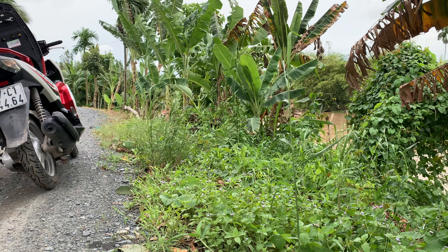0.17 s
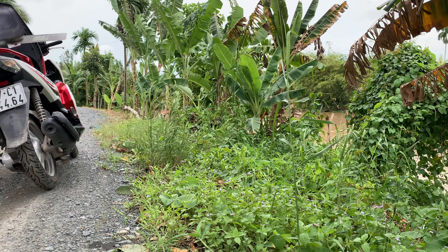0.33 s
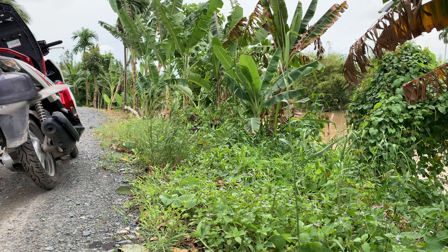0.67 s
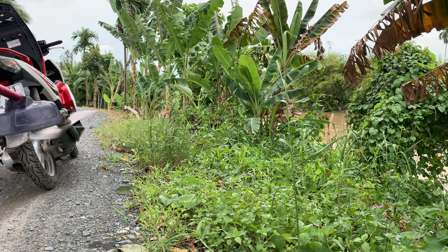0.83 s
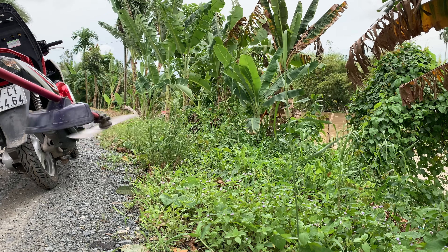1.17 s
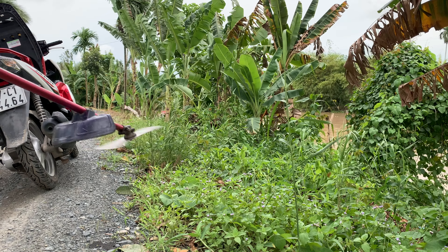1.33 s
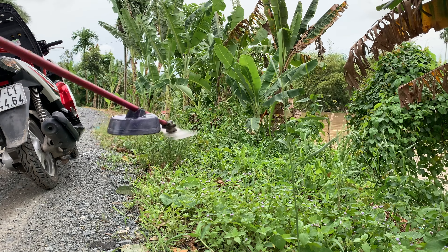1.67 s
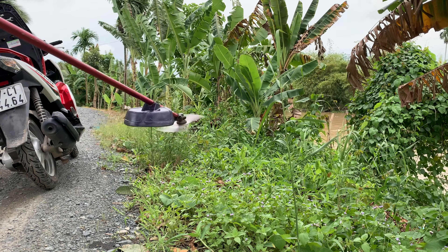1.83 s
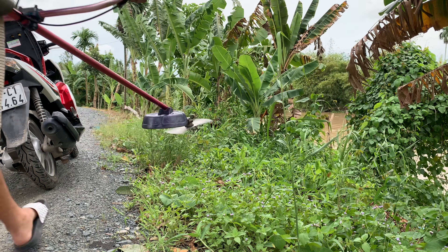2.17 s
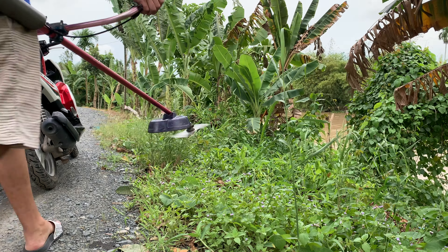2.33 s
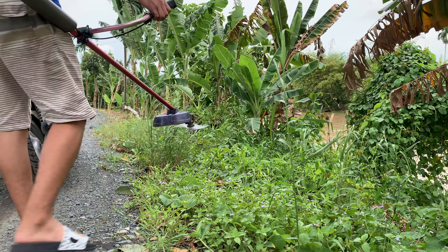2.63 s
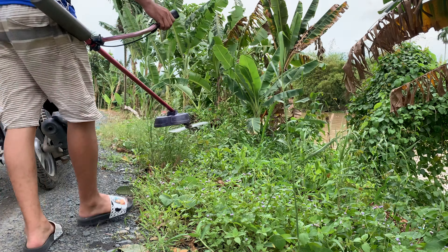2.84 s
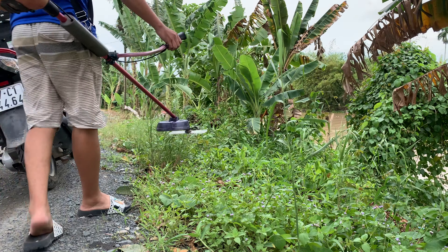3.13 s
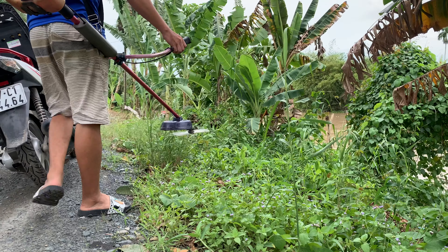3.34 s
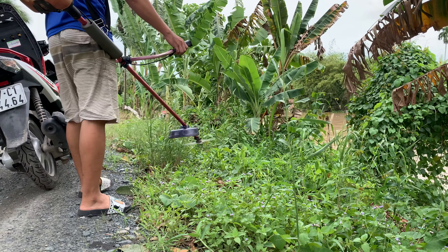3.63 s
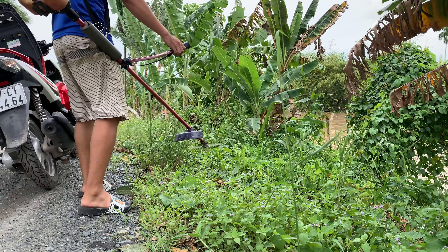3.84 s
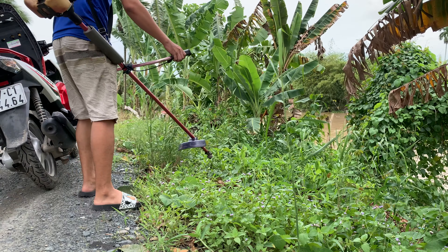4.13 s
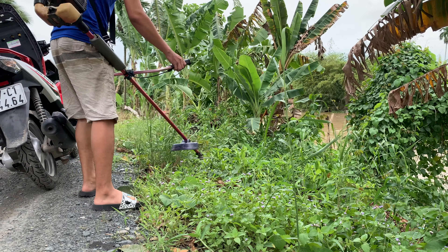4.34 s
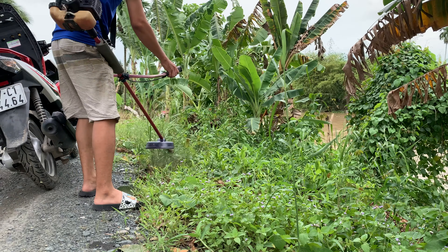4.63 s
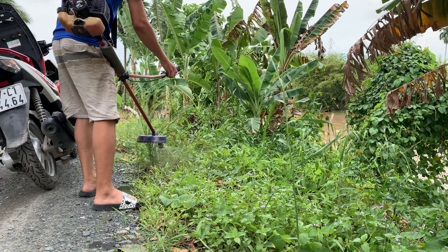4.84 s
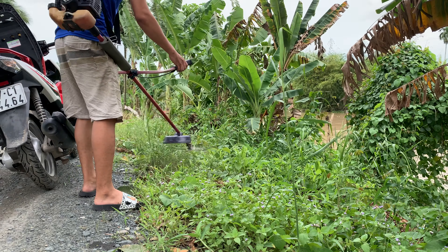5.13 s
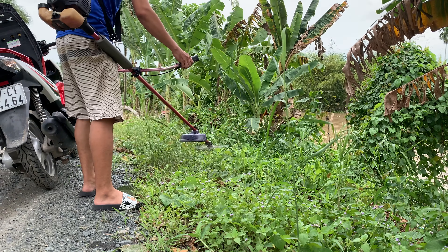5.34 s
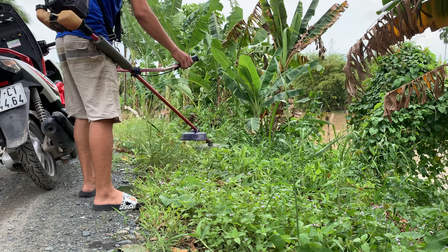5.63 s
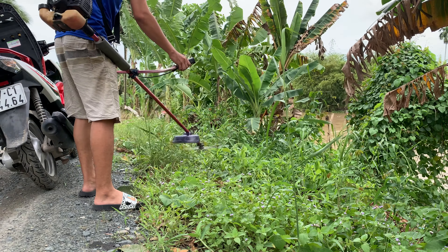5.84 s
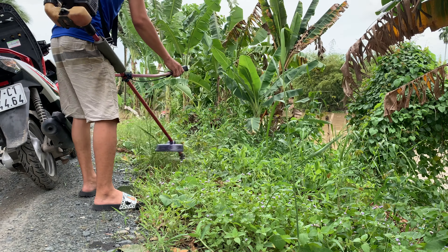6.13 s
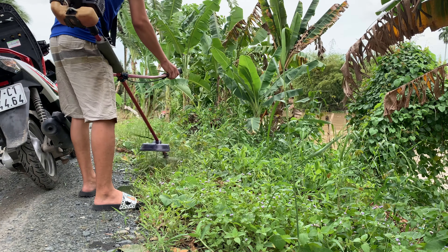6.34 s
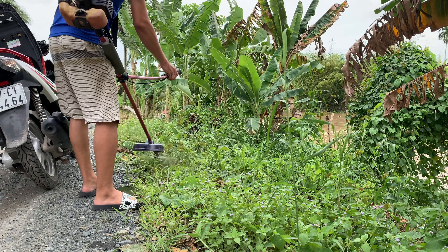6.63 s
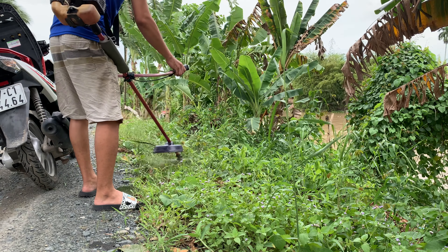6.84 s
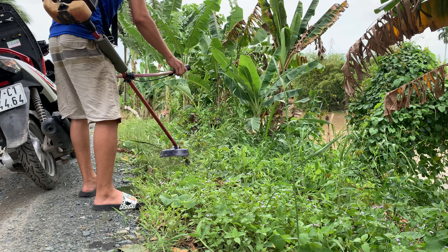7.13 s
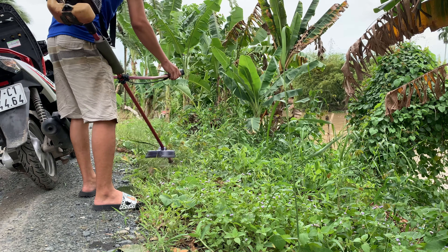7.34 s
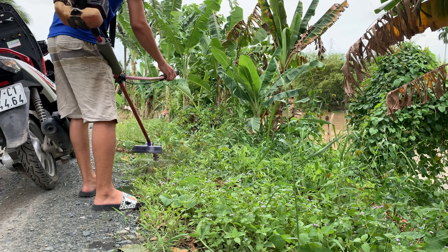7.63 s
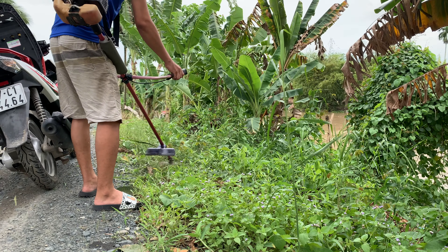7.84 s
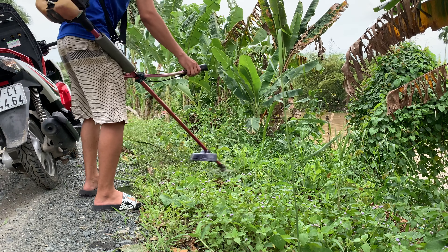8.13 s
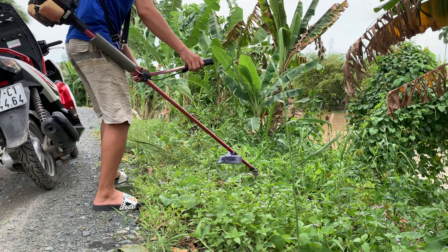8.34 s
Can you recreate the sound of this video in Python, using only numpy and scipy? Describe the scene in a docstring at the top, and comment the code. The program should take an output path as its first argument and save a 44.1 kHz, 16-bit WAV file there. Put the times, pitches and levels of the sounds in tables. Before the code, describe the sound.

A small two-stroke brushcutter buzzes past close by, sputtering unevenly, then moves off, revs up and tears through grass beside a softly thumping idling scooter.

```python
"""Roadside verge: a man carries a running two-stroke brushcutter past the microphone, then cuts grass.
The engine falls into spells of uneven firing, every second or third turn hard; muffler resonances
shape its pulses into a boom that fades with distance, a honk and a hum, with rasp and fan whine on top.
Filtered noise makes the blade's hiss, passing bands of hiss and rattle, and bursts of snaps as it tears
leaves and cracks stalks; grit ticks underfoot, and a parked scooter idles in slow thumps."""
import sys
import numpy as np
from scipy import signal
from scipy.fft import rfft, irfft
from scipy.io import wavfile
from scipy.ndimage import uniform_filter1d, map_coordinates

SR = 44100
rng = np.random.default_rng(int(sys.argv[2]) if len(sys.argv) > 2 else 0)


def generate_wav(signal):
    """Clip the signal to [-1, 1] and save it as 16-bit WAV at the path in sys.argv[1]."""
    frames = np.transpose(np.atleast_2d(signal))
    scaled = np.clip(frames, -1, 1) * 32767
    pcm = np.round(scaled).astype(np.int16)
    wavfile.write(sys.argv[1], SR, pcm)


N = 374409
T = np.arange(N) / SR

# crank speed: time_s, turns_hz
CRANK_SPEED = [(0.0, 68.81), (0.08, 73.0), (0.2, 74.96), (0.4, 74.11), (0.88, 76.8), (1.12, 78.6),
               (1.36, 77.8), (1.44, 75.12), (1.6, 71.8), (2.24, 68.51), (2.48, 68.19), (2.56, 68.68),
               (2.72, 71.35), (2.88, 77.13), (2.96, 78.93), (3.24, 78.54), (3.48, 79.6), (3.88, 79.95),
               (4.32, 78.53), (4.52, 79.4), (4.68, 79.22), (4.88, 81.86), (5.32, 90.7), (5.88, 92.67),
               (6.16, 90.76), (6.44, 85.39), (6.68, 82.5), (6.92, 78.26), (7.24, 77.47), (7.4, 74.78),
               (7.6, 75.15), (8.48, 75.77)]
# exhaust before surges: time_s, honk_db, hum_db
EXHAUST_LEVELS = [(0, -23.5, -20.5), (.7, -21.5, -19.5), (1.6, -23.5, -26.5), (2.2, -23.5, -29),
                  (2.65, -22.5, -26), (2.95, -18, -22), (4.1, -23, -24), (5.2, -26.5, -30),
                  (8.49, -28, -33)]
# extra hard firings: time_s
BANG_TIMES_S = [.335, .376, .417, .484, .563, .671, .762, .828, .867, .906, .945, .984, 1.112, 1.264, 4.002,
                4.028, 4.203, 4.305, 4.331, 4.356, 4.457, 4.482, 5.9, 5.932, 5.965, 5.998, 6.107, 6.24,
                6.494, 6.934, 6.985, 7.126, 7.216, 7.893, 7.946, 7.986, 8.066, 8.106, 8.147, 8.213]
# hard firing against an average turn; the starved turns beside it lose as much: time_s, gain_db
BANG_GAINS = [(1.3, 3.8), (4.3, 4.2), (5.9, 5.8)]
# spells of uneven firing: start_s, length_s, stumble_0_to_1, timing_jitter_ms, turns_per_hard_firing
UNEVEN_SPELLS = [(0.295, 0.95, 0.99, 0.093, 3), (1.905, 1.05, 0.86, 0.11, 3), (3.244, 0.22, 0.88, 0.26, 2),
                 (4, 0.32, 0.7, 0.08, 2), (5.25, 1.2, 0.8, 0.34, 3), (6.716, 0.77, 0.91, 0.21, 2),
                 (7.872, 0.96, 0.87, 0.17, 3)]
# brief exhaust swells and lulls: middle_s, length_s, change_db
EXHAUST_SURGES = [(0.272, .07, -2), (1.5, 0.42, -3.5), (4.503, 0.082, 4), (4.675, 0.27, -6),
                  (6.596, 0.14, 5.5), (7.58, 0.18, -4.5)]
# tailpipe resonances: pitch_hz, q, gain_ratio
TAILPIPE_RINGS = [(544, 104, 1.0), (623, 9.7, 0.81)]
# cooling fan whine: time_s, level_db
FAN_WHINE = [(0, -21), (.5, -47), (1.6, -54), (2.2, -28.5), (2.6, -40), (3.0, -27.5), (3.6, -32.5),
             (4.1, -64), (5.4, -63), (6.5, -46), (7.6, -33), (8.49, -43)]
# crank multiples that sing out: start_s, length_s, level_db, crank_multiple
CRANK_DRONES = [(0.302, 1.11, -26.5, 4), (1.546, 1.07, -34.5, 4), (5.3, 1.05, -32.5, 6), (6.55, .1, -29, 7),
                (7.0, 1.4, -40, 9)]
# relative spectrum, low exhaust hum: pitch_hz, level_db
HUM_SPECTRUM = [(40, -36), (75, -0.5), (92, 6), (155, 2.5), (185, 0.5), (235, 1), (330, -26.5), (410, -6),
                (600, -54.5)]
# relative spectrum, muffler boom: pitch_hz, level_db
BOOM_SPECTRUM = [(120, -39), (210, 5.5), (295, 11), (370, 8.5), (470, 4.5), (550, 6.5), (680, -19),
                 (870, -6), (1100, -24.5), (2500, -110.5)]
# relative spectrum, exhaust honk: pitch_hz, level_db
HONK_SPECTRUM = [(150, -47), (320, -7), (400, -8), (470, 8.5), (560, 2), (650, 7.5), (720, 4), (790, -1.5),
                 (880, -4.5), (1050, -7), (1300, -5.5), (1550, -32.5), (4000, -43)]
# relative spectrum, gas and piston rattle: pitch_hz, level_db
RASP_SPECTRUM = [(600, 4), (1300, 4), (1750, 4.5), (2050, 1.5), (2500, 5.5), (3000, -2), (3600, -3),
                 (5000, -2.5), (8000, -36.5)]
# relative spectrum, blade hiss and grit: pitch_hz, level_db
AIR_SPECTRUM = [(2500, 1.5), (4200, -2.5), (5200, -0.5), (6500, -3.5), (8600, 4), (11000, -3.5),
                (13000, -1), (16000, -5)]
# relative spectrum, torn leaves: pitch_hz, level_db
LEAF_SPECTRUM = [(1000, -19), (2500, -30), (5000, -3.5), (7000, -3), (9200, 10), (11000, 5.5), (14000, 2.5),
                 (16000, 5.5)]
# relative spectrum, cracked stalks: pitch_hz, level_db
STALK_SPECTRUM = [(300, 20), (800, 22), (1500, 15), (1950, 17), (2700, 21), (4000, 27), (5500, -2),
                  (7000, -45), (12000, -46)]
# relative spectrum, scooter thump: pitch_hz, level_db
SCOOTER_SPECTRUM = [(38, -23.5), (52, 4.5), (68, 6), (88, 3.5), (125, -0.5), (195, -4), (280, -10.5),
                    (600, -102)]
# idling scooter, common to thumps and drone: time_s, relative_db
SCOOTER_LEVELS = [(0, -14), (3.3, -14), (4.5, -21), (6.5, -18.5), (8.49, -18.5)]
# steel blade modes: pitch_hz, relative_db, t60_s
BLADE_MODES = [(1500, -2, .1), (2600, -1, .15), (2702, -4, .28), (2802, -3, .35), (2900, -3, .3),
               (3270, -5, .2), (3400, -1, .22), (3959, -2, .15), (4160, -3, .12), (4997, -5, .12),
               (5658, -2, .1), (9032, -7, .1), (9215, -7, .1)]
# passing bands of hiss and rattle, some gliding as the machine goes by:
# middle_s, length_s, pitch_hz, half_width_hz, glide_hz_per_s, level_db
PASSING_BANDS = [(0.17, 0.49, 1333, 60, -200, -35), (.2, .08, 1760, 70, 2, -29),
                 (0.45, 0.79, 3320, 600, -2300, -36), (0.92, 0.19, 2260, 600, 0, -26),
                 (0.9, 0.24, 9460, 1170, -0.5, -34.5), (1.83, 0.47, 4930, 189, 98.5, -33.5),
                 (2.68, 0.6, 8390, 402, -200, -34.5), (3.198, 2.9, 12160, 2244, 2.5, -39.5),
                 (8.137, 0.5, 8640, 306, -100, -40)]
# grit and flung bits: time_s, relative_db
GRIT_TICKS = [(2.4736, -18), (3.273, -17.5), (3.324, -15), (3.363, -13), (3.6643, -17), (4.5585, -19),
              (7.187, -20)]
# blade through grass: middle_s, length_s, leaves_db, stalks_db
GRASS_STROKES = [(4.07, 0.066, -28.5, -27), (4.165, 0.11, -27.5, -26), (4.545, 0.12, -15.5, -22),
                 (4.71, 0.25, -24, -37.5), (5.015, 0.25, -27, -43), (6.253, 0.38, -25, -47),
                 (6.388, 0.11, -21, -40), (6.6, 0.18, -26, -55), (6.801, 0.089, -24, -45),
                 (6.903, 0.22, -21, -30.5), (7.275, 0.026, -20, -30), (7.342, 0.18, -16.5, -21),
                 (7.447, 0.11, -18.5, -34)]
# blade hits a thick stalk: time_s, level_db
STALK_CHOPS = [(4.053, -19.5), (4.08, -19), (4.556, -21), (6.938, -33), (7.328, -25), (7.456, -18)]
# microphone pair: pitch_hz, left_minus_right_db
MIC_SHADE = [(200, 0.5), (380, -1.5), (700, 2), (1000, 8), (1300, 7.5), (2400, 2.5), (4400, 1.5),
             (8000, -0.5)]

# straight walk past the left of the microphone, stopping at the verge
WALK_M_S, ABREAST_S, ASIDE_M, STOP_M = 0.63, 1.304, 0.857, 1.813
ENGINE_HEIGHT_M, MIC_HEIGHT_M, MIC_SPACING_M = 0.846, 0.673, 0.14
SOUND_M_S = 343
# levels until he is abreast, then their fade: metres to half amplitude, steepness
BOOM_DB, BOOM_REACH_M, BOOM_FALL = -20, 1.05, 2.34
RASP_DB, RASP_REACH_M, RASP_FALL = -32, 1.575, 3.7
# firing outside the spells, and edges of the spells
EVEN_STUMBLE, EVEN_JITTER_MS = .55, .08
SPELL_ATTACK_S, SPELL_RELEASE_S = 0.1, 0.35
# at full stumble: a hard firing's boom leads, and every boom strays
BOOM_EARLY_MS, BOOM_JITTER_MS = .95, .3
# gas hiss in each puff: share at full stumble, decay
GAS_SHARE, GAS_MS = .56, 12.
FAN_VANES = 8
DRONE_ATTACK_S, DRONE_RELEASE_S = 0.11, 0.062
IDLE_HZ = 12.45
# hiss is shaded until the blade comes round in front of the microphone
HISS_DB, BEHIND_DB, IN_FRONT_S = -33.5, -2.5, 1
BAND_FLICKER_DB, BAND_FLICKER_PER_S = 3., 120
RING_WOBBLE_MS, RING_FLUTTER_DB = .04, 3.
STALK_RING_DB, CHOP_RING_DB, CHOP_MS = -9, -5, 6.
TREBLE_LEAD_MS = -.215  # negative: right microphone leads
TOP_HZ = 15900


def undb(db):
    """Decibels to gain."""
    return 10 ** (np.asarray(db) / 20)


def unit(x):
    """Scale to rms 1."""
    return x / np.sqrt(np.mean(x ** 2))


def curves(table):
    """Table columns interpolated at every sample."""
    time_s, *columns = np.transpose(table)
    return [np.interp(T, time_s, column) for column in columns]


def noise():
    """White noise."""
    return rng.standard_normal(N)


def wander(rate_hz):
    """Random points joined by lines, spread near 1."""
    return 1.2 * np.interp(T * rate_hz, np.arange(4000), rng.standard_normal(4000))


def held(start_s, length_s, attack_s, release_s):
    """Attack up to the start, hold, then exponential release."""
    attack = np.clip((T - start_s) / attack_s + 1, 0, 1)
    return attack * np.exp(-np.maximum(T - start_s - length_s, 0) / release_s)


def bell(middle_s, length_s):
    """Smooth rise and fall around a moment."""
    return np.exp(-(2 * (T - middle_s) / length_s) ** 2)


def gains_db(spectrum, size):
    """Spectrum interpolated on log frequency at the bins of a transform."""
    hz, db = np.transpose(spectrum)
    bin_hz = np.arange(size // 2 + 1) * SR / size
    return np.interp(np.log(bin_hz + 1), np.log(hz), db)


def colour(x, spectrum, size=8192):
    """Ring x through a causal minimum-phase body with this spectrum; rms 1."""
    cepstrum = irfft(np.log(undb(gains_db(spectrum, size))))
    cepstrum[1:size // 2] *= 2
    cepstrum[size // 2 + 1:] = 0
    body = irfft(np.exp(rfft(cepstrum)))
    return unit(signal.fftconvolve(x, body)[:N])


def delay(x, ms):
    """Delay by a fixed or moving time."""
    return map_coordinates(x, [np.arange(N) - ms * SR / 1000], order=3)


def strikes(times_s, sizes):
    """One impulse at each time."""
    return np.bincount(np.clip(times_s * SR, 0, N - 1).astype(int), sizes, N)


def fade(x, ms):
    """Give each impulse an exponential tail."""
    return signal.lfilter([1], [1, -np.exp(-1000 / (ms * SR))], x)


def pair(x, lead_ms):
    """Sound at two microphones, the left one leading."""
    return np.array([delay(x, -lead_ms / 2), delay(x, lead_ms / 2)])


def foliage(x, t60_s, size=16384):
    """Diffuse scatter from plants and road, different at each microphone."""
    t = np.arange(size) / SR
    decay = undb(-60 * t / t60_s) * (t > .004)
    tails = rng.standard_normal((2, size)) * decay
    return np.array([signal.fftconvolve(x, tail / np.linalg.norm(tail))[:N] for tail in tails])


def crackle(rate_hz, spread_db, tail_ms):
    """Sharp noisy snaps at random moments, a few much louder than the rest."""
    chance = rng.random((8000, 2))[:int(rate_hz * N / SR)]
    sizes = undb(-spread_db * np.log(.01 + chance[:, 1]))
    return unit(fade(strikes(chance[:, 0] * N / SR, sizes), tail_ms) * noise())


def walk():
    """Metres past the microphone, road echo lag in ms, left microphone lead in ms."""
    along_m = np.minimum(WALK_M_S * (T - ABREAST_S), STOP_M)
    distance_m = np.hypot(along_m, ASIDE_M)
    bounced_m = np.hypot(distance_m, ENGINE_HEIGHT_M + MIC_HEIGHT_M)
    direct_m = np.hypot(distance_m, ENGINE_HEIGHT_M - MIC_HEIGHT_M)
    ms_per_m = 1000 / SOUND_M_S
    echo_ms = (bounced_m - direct_m) * ms_per_m
    lead_ms = MIC_SPACING_M * ASIDE_M / distance_m * ms_per_m
    return np.maximum(along_m, 0), echo_ms, lead_ms


def receding(past_m, reach_m, fall):
    """Level change in dB: none until abreast, half amplitude at the reach, falling on beyond it."""
    return -20 * np.log10(1 + (past_m / reach_m) ** fall)


def stumbling():
    """How unevenly the engine fires, 0-1."""
    spells = [depth * held(start_s, length_s, SPELL_ATTACK_S, SPELL_RELEASE_S)
              for start_s, length_s, depth, _, _ in UNEVEN_SPELLS]
    return np.maximum(np.max(spells, axis=0), EVEN_STUMBLE)


def crank_turns():
    """Turns since the start, shifted smoothly so that bangs fall close to whole turns."""
    turns = np.cumsum(curves(CRANK_SPEED)[0]) / SR
    bang_s = np.array(BANG_TIMES_S)
    bang_phase = np.unwrap(np.interp(bang_s, T, turns) % 1, period=1)
    return turns - uniform_filter1d(np.interp(T, bang_s, bang_phase), size=SR // 4)


def firings(crank, stumble_db=2.5, scatter_db=2.0, slip=.12):
    """Time, strength and boom time per turn: spent gas weakens turns, then a fresh charge fires hard."""
    times_s = np.interp(np.arange(0, crank[-1]), crank, T)
    count = len(times_s)
    chance = rng.standard_normal((1000, 2))[:count]
    slips = rng.random(1000) < slip
    stumble = np.interp(times_s, T, stumbling())
    bang_s = np.array(BANG_TIMES_S)
    bangs = np.argmin(abs(times_s - bang_s[:, None]), axis=1)
    every, jitter_ms = np.full(count, 2), np.full(count, EVEN_JITTER_MS)
    for start_s, length_s, _, spell_jitter_ms, spell_turns in UNEVEN_SPELLS:
        inside = (times_s > start_s) & (times_s < start_s + length_s)
        every[inside], jitter_ms[inside] = round(spell_turns), spell_jitter_ms
    fired, last = np.zeros(count), 0
    for k in range(count):
        due = k - last >= every[k] + slips[k]
        if k in bangs or (due and k + 1 not in bangs):
            fired[k], last = 1, k
    db = stumble * (stumble_db * fired + scatter_db * chance[:, 0])
    # fuel flows evenly, so neighbouring turns share their energy
    db -= 10 * np.log10(uniform_filter1d(undb(db) ** 2, size=6))
    bang_db = np.interp(bang_s, *np.transpose(BANG_GAINS))
    db[bangs - 1] = db[bangs + 1] = -bang_db
    db[bangs] = bang_db
    boom_ms = stumble * (BOOM_JITTER_MS * chance[:, 1] - BOOM_EARLY_MS * fired)
    return times_s + jitter_ms * chance[:, 1] / 1000, undb(db), times_s + boom_ms / 1000


def disperse(x, ms, corner_hz):
    """Low notes linger in the muffler chambers, so each puff smears into a falling chirp."""
    hz = np.arange(N // 2 + 1) * SR / N
    phase = 2 * np.pi * ms / 1000 * corner_hz * np.exp(-hz / corner_hz)
    return irfft(rfft(x) * np.exp(1j * phase), N)


def exhaust(pulses, turns, blasts, surge_db, past_m, echo_ms, ground):
    """Pulses ring the muffler as hum, boom and honk, each doubled by the road's echo."""
    honk_db, hum_db = curves(EXHAUST_LEVELS)
    boom_db = BOOM_DB + receding(past_m, BOOM_REACH_M, BOOM_FALL) + surge_db
    gas = unit(fade(pulses, GAS_MS) * noise())
    puffs = -unit(pulses) + GAS_SHARE * stumbling() ** 2 * gas
    honk = disperse(puffs, ms=8.41, corner_hz=599.0)
    # the tailpipe keeps ringing between puffs
    rings = sum(gain * signal.lfilter(*signal.iirpeak(hz, q, fs=SR), honk)
                for hz, q, gain in TAILPIPE_RINGS)
    boom = disperse(-blasts, ms=12.166, corner_hz=509.6)
    # the piston pumps gas whether the charge fires or not, so the hum stays steadier
    parts = [(-turns, HUM_SPECTRUM, hum_db), (boom, BOOM_SPECTRUM, boom_db),
             (-(honk + rings), HONK_SPECTRUM, honk_db + surge_db)]
    out = 0
    for drive, spectrum, db in parts:
        direct = colour(drive, spectrum)
        # comb peaks climb as the engine moves away
        out = out + unit(direct + ground * delay(direct, echo_ms)) * undb(db)
    return out


def drones(exhaust_sound, crank):
    """Clean crank multiples phased with the exhaust: steady fan vane whine and passing drones."""
    def tone(multiple):
        spin = np.exp(2j * np.pi * multiple * crank)
        phase = np.angle(signal.fftconvolve(exhaust_sound / spin, np.hanning(SR // 2), "same"))
        return unit(np.real(spin * np.exp(1j * phase)))
    out = tone(FAN_VANES) * undb(curves(FAN_WHINE)[0])
    for start_s, length_s, db, multiple in CRANK_DRONES:
        envelope = held(start_s, length_s, DRONE_ATTACK_S, DRONE_RELEASE_S)
        out = out + tone(round(multiple)) * undb(db) * envelope
    return out


def rattle(turns, gate):
    """Piston knock that repeats each turn, plus fresh gas noise gated by the firings."""
    knock = irfft(np.exp(2j * np.pi * rng.random(290)))
    clatter = colour(unit(signal.fftconvolve(turns, knock)[:N]), RASP_SPECTRUM)
    return .75 * clatter + .35 * colour(gate * noise(), RASP_SPECTRUM)


def engine(rumble_db=-42, ground=0.45, rasp_ms=6.4, rasp_steady=1.0, port_share=0.8, scatter_db=-17):
    """Two-stroke engine in stereo, with its throb: firings drive exhaust, drones, rattle and rumble."""
    crank = crank_turns()
    times_s, force, boom_times_s = firings(crank)
    past_m, echo_ms, lead_ms = walk()
    surge_db = sum(db * bell(middle_s, length_s) for middle_s, length_s, db in EXHAUST_SURGES)
    pulses, turns = strikes(times_s, force), strikes(times_s, force ** .3)
    blasts = strikes(boom_times_s, force)
    out = exhaust(pulses, turns, blasts, surge_db, past_m, echo_ms, ground)
    out = out + drones(out, crank)
    gate = unit(unit(fade(pulses, rasp_ms)) + rasp_steady)
    rasp = rattle(turns, gate)
    rasp_gain = undb(RASP_DB + receding(past_m, RASP_REACH_M, RASP_FALL))
    out += (rasp + ground * delay(rasp, echo_ms)) * rasp_gain
    # unburnt gas rumbles through the muffler, most while the engine stumbles
    out += colour(gate * noise(), BOOM_SPECTRUM) * stumbling() ** 2 * undb(rumble_db + surge_db)
    # gas and fan air reach each microphone differently
    air = np.array([colour(gate * noise(), RASP_SPECTRUM) for _ in range(2)])
    stereo = pair(out, lead_ms) + port_share * air * rasp_gain
    throb = unit(fade(pulses, 25.0))
    return stereo + undb(scatter_db) * foliage(out, t60_s=0.29), throb


def scooter(thump_db=-11, drone_db=-12.0):
    """Slow, even four-stroke thumps; the silencer drones on their seventh multiple."""
    cycles = np.cumsum(IDLE_HZ * (1 + 0.0032 * wander(1.453))) / SR
    times_s = np.interp(np.arange(.5, cycles[-1]), cycles, T)
    pulses = strikes(times_s, np.ones(len(times_s)))
    gas = unit(fade(pulses, 70.) * noise())
    thumps = colour(unit(pulses) + 1.2 * gas, SCOOTER_SPECTRUM)
    drone = unit(np.sin(2 * np.pi * 7 * cycles))
    out = (undb(thump_db) * thumps + undb(drone_db) * drone) * undb(curves(SCOOTER_LEVELS)[0])
    return pair(out, lead_ms=0.4)


def blade_ring(x):
    """Steel blade modes shaken by x; spinning makes their pitch and loudness waver."""
    t = T[:SR // 2]
    steel = sum(undb(db - 60 * t / t60_s) * np.sin(2 * np.pi * hz * t) for hz, db, t60_s in BLADE_MODES)
    ring = signal.fftconvolve(x, steel / np.linalg.norm(steel))[:N]
    spin = np.sin(2 * np.pi * np.cumsum(curves(CRANK_SPEED)[0]) / SR)
    return delay(ring, RING_WOBBLE_MS * spin) * unit(undb(RING_FLUTTER_DB * wander(120)))


def passing_bands(shake):
    """Passing bands of noise, some gliding, broken into grains."""
    hiss, out = noise() + 1j * noise(), 0
    grain = shake * undb(BAND_FLICKER_DB * wander(BAND_FLICKER_PER_S))
    for middle_s, length_s, hz, half_width_hz, glide_hz_per_s, db in PASSING_BANDS:
        slow = signal.sosfilt(signal.butter(2, half_width_hz, fs=SR, output="sos"), hiss)
        pitch_hz = hz + glide_hz_per_s * (T - middle_s)
        band = np.real(slow * np.exp(2j * np.pi * np.cumsum(pitch_hz) / SR))
        out = out + unit(band * grain) * undb(db) * bell(middle_s, length_s)
    return out


def spinning_blade(throb, throb_share=0.67, gear_share=1.0, ring_db=-49, scatter_db=-9):
    """Gear chatter and hiss that shake with the engine, ringing steel and passing hiss bands."""
    shake = 1 + throb_share * throb
    chatter = unit(noise() * shake) + gear_share * crackle(rate_hz=220, spread_db=3.6, tail_ms=1.5)
    shade_db = BEHIND_DB * np.maximum(1 - T / IN_FRONT_S, 0)
    hiss = colour(chatter, AIR_SPECTRUM) * undb(HISS_DB + shade_db)
    ring = unit(blade_ring(chatter)) * undb(ring_db)
    stereo = pair(hiss + passing_bands(shake) + ring, TREBLE_LEAD_MS)
    return stereo + undb(scatter_db) * foliage(hiss, t60_s=0.0051)


def grit(tick_ms=4.6, tick_db=-4):
    """Short dry ticks of gravel and flung bits: decaying bursts of coloured noise."""
    times_s, db = np.transpose(GRIT_TICKS)
    bursts = fade(strikes(times_s, undb(db + tick_db)), tick_ms)
    return pair(colour(noise(), AIR_SPECTRUM) * bursts, TREBLE_LEAD_MS)


def cutting(chop=0.076, snap_share=0.37, ragged_db=1.5, scatter_db=-11):
    """The blade tears leaves on each turn; thick stalks crack and ring the steel."""
    tips = 1 + chop * np.cos(2 * np.pi * np.cumsum(curves(CRANK_SPEED)[0]) / SR)
    tears = crackle(rate_hz=400, spread_db=4., tail_ms=1.2)
    snaps = (noise() + snap_share * tears) * tips * undb(ragged_db * wander(45))
    contact = np.array([bell(middle_s, length_s) for middle_s, length_s, _, _ in GRASS_STROKES])
    shred, bite = undb(np.transpose(GRASS_STROKES)[2:]) @ contact
    leaves = colour(snaps, LEAF_SPECTRUM) * shred
    cracks = crackle(rate_hz=600, spread_db=3.6, tail_ms=2.)
    stalks = colour(cracks, STALK_SPECTRUM) * bite
    stalks = stalks + blade_ring(cracks * bite) * undb(STALK_RING_DB)
    scatter = undb(scatter_db) * foliage(stalks + .5 * leaves, t60_s=0.094)
    return pair(leaves, TREBLE_LEAD_MS) + pair(stalks, lead_ms=0.14) + scatter


def chops():
    """Single hard cracks of thick stalks, each leaving the steel ringing."""
    times_s, db = np.transpose(STALK_CHOPS)
    crack = colour(noise(), STALK_SPECTRUM) * fade(strikes(times_s, undb(db)), CHOP_MS)
    return pair(crack + blade_ring(crack) * undb(CHOP_RING_DB), lead_ms=.13)


def scene():
    """Brushcutter, scooter, gravel and grass."""
    motor, throb = engine()
    return motor + scooter() + spinning_blade(throb) + grit() + cutting() + chops()


def record(dry):
    """The microphone pair favours the left through most of the middle range and cuts the top."""
    shade_db = gains_db(MIC_SHADE, N) * np.array([[.5], [-.5]])
    heard = irfft(rfft(dry) * undb(shade_db), N)
    return signal.sosfilt(signal.ellip(10, .2, 80, TOP_HZ, fs=SR, output="sos"), heard)


dry = scene()
out = record(dry)
generate_wav(out)
```